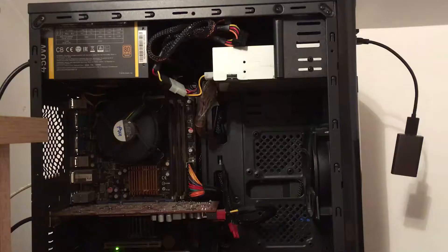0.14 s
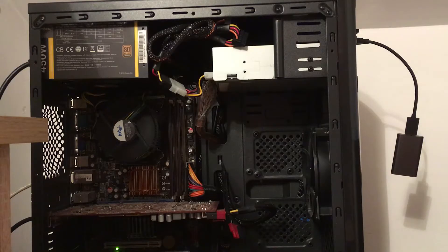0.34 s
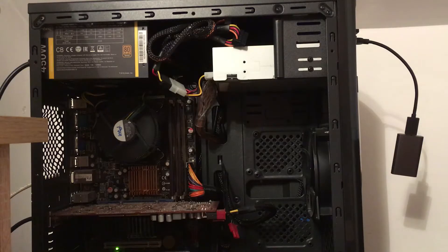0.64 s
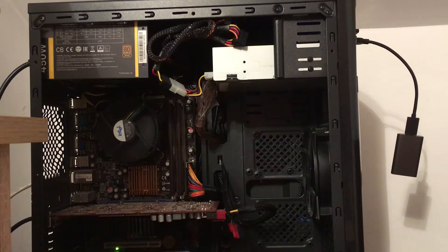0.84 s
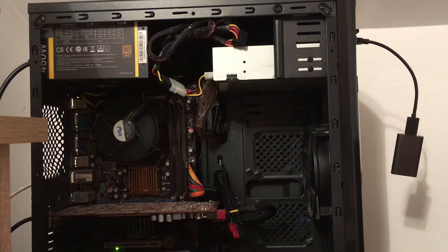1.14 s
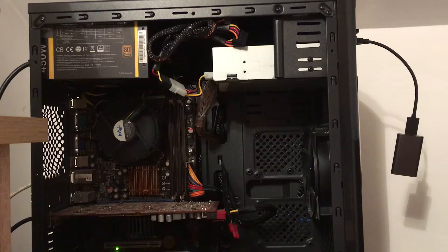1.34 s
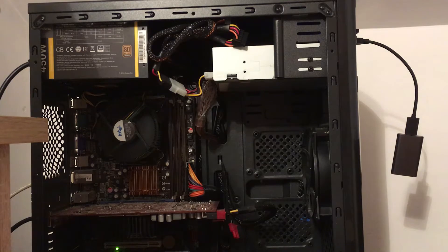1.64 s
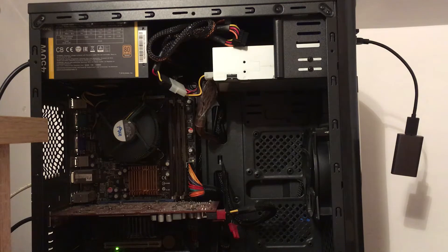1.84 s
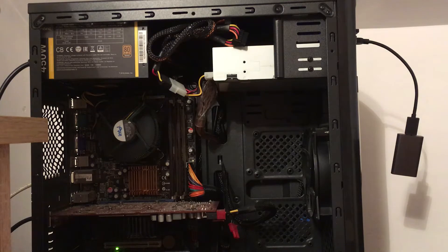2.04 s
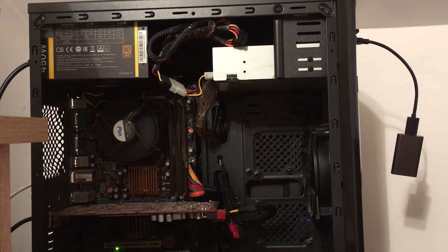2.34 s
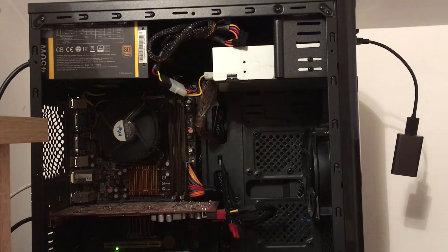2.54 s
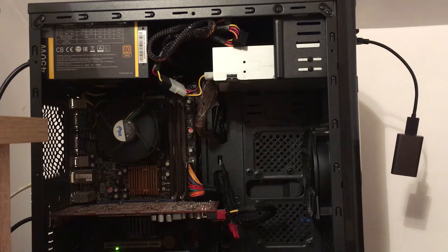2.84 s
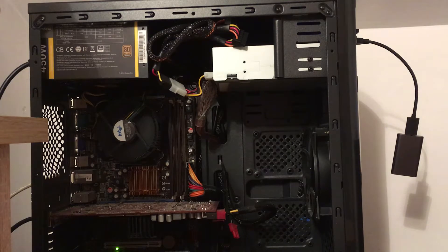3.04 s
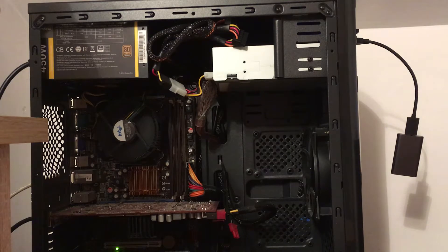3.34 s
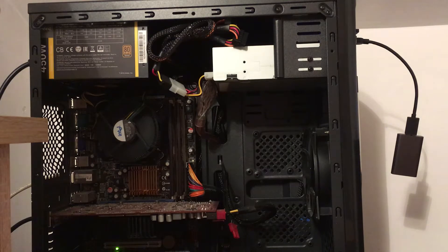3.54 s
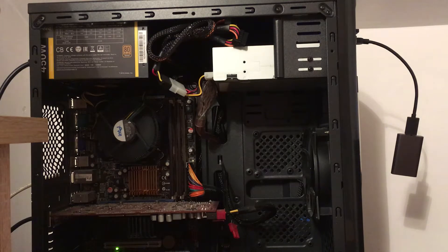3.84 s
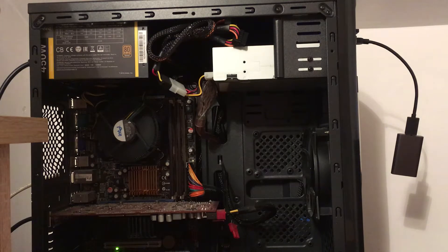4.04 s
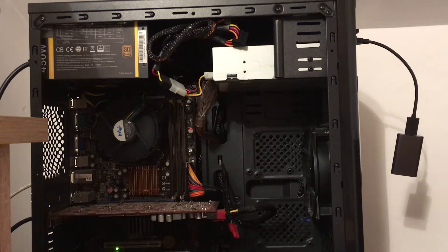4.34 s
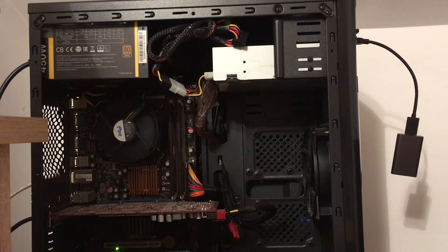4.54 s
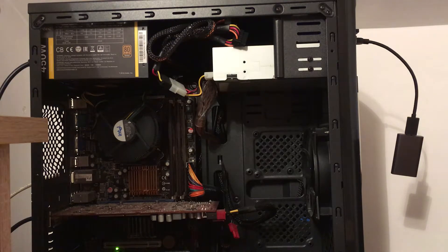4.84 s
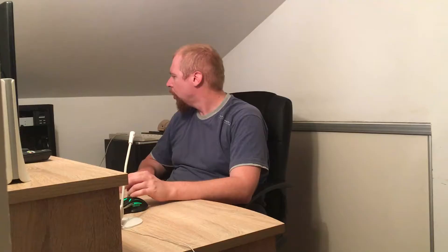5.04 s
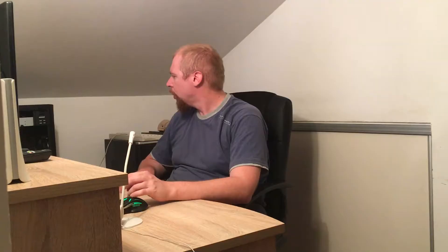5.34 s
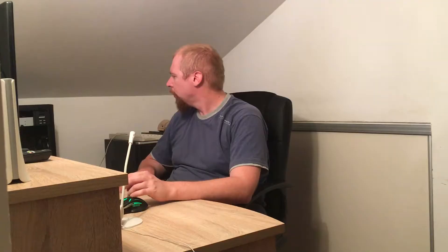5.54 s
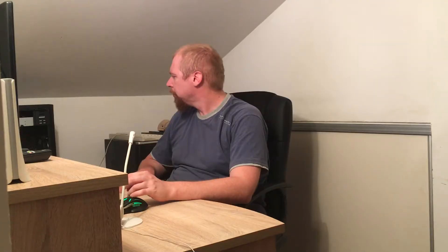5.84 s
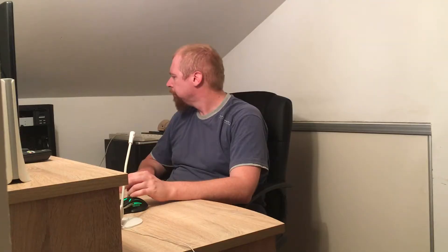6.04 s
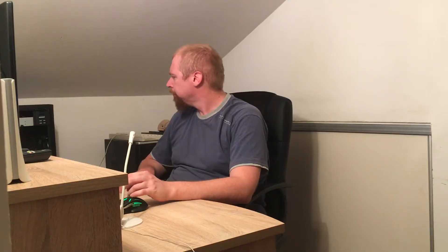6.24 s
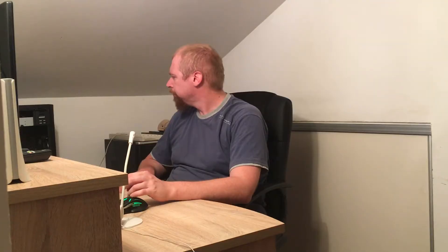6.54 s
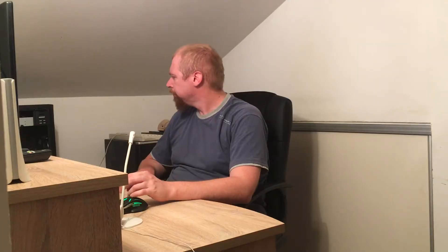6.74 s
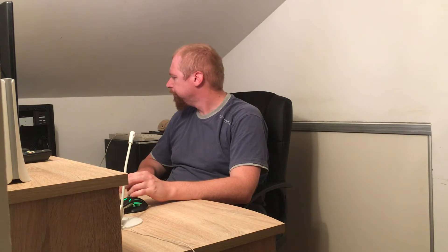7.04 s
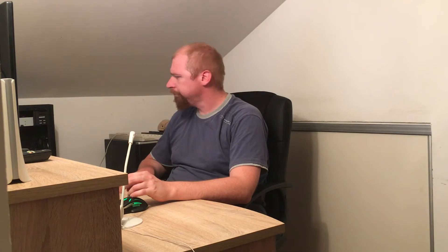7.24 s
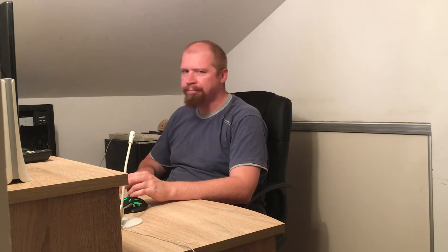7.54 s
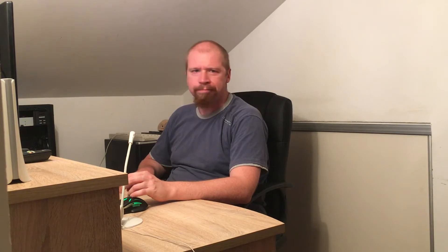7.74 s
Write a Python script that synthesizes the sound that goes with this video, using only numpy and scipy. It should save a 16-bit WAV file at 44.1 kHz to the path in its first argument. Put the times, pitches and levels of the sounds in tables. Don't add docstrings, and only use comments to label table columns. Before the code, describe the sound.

Continuous close-up computer fan noise indoors: a clear steady tone, smooth airy rush, deep hum and a thin electrical whine and buzz. Low draughts flutter on the microphone. A far engine climbs slowly in pitch early, drops out, returns fainter and disappears, with a barely audible glimpse near the end. The main fan tone rises louder around five seconds, then settles.

```python
import sys
import numpy as np
from scipy import signal
from scipy.fft import rfft, irfft, next_fast_len
from scipy.io import wavfile
from scipy.ndimage import uniform_filter1d

SR = 44100
rng = np.random.default_rng(int(sys.argv[2]) if len(sys.argv) > 2 else 0)


def volts(x):
    e = np.asarray(x, float) / 20
    return 10 ** e


def digitize_waveform(pressure):
    field = np.atleast_2d(pressure).T
    bounded = np.clip(field, -1, 1)
    quanta = np.round(bounded * 32767).astype(np.int16)
    wavfile.write(sys.argv[1], SR, quanta)


N = 348557
TIME = np.arange(N) / SR

# time_s, pitch_hz of its 32nd shaft order
REAR_SPEED = [
    (0, 686.5),
    (.75, 686.5),
    (1.8, 684.6),
    (2.9, 686.3),
    (4.2, 687.2),
    (4.85, 690.9),
    (5.8, 686.7),
    (7.1, 687.8),
    (7.9, 686.8),
]
REAR_ORDERS = [8, 9, 12, 17, 20, 28, 29, 33, 34]
REAR_DB = [-70, -71.5, -75.5, -70.5, -74, -73.5, -80, -68.5, -74.5]
PANEL_HZ, PANEL_DB = 694.7, -42.7
COOLER_HZ = 35.665
COOLER_ORDERS = [7, 8, 13, 14, 15, 16, 18, 20, 21, 24, 28, 29, 32, 35, 47, 56, 63]
COOLER_DB = [-69.5, -75, -77, -76, -76, -66.5, -76, -64, -72.5, -79, -73, -78, -79, -79, -84, -78, -82]
FRONT_HZ, SURGE_S = 5015, .3
# time_s, shift_hz
SURGES = [
    (0, -1.7),
    (.75, 4.6),
    (4.85, 2.8),
    (6.35, -2.3),
    (7.05, 2.6),
]
FRONT_ORDERS = [177, 193, 195, 196, 197, 207, 208, 210, 213, 220, 231, 238, 249, 251, 255, 257, 261, 262,
                263, 268, 269, 270, 272, 273, 282, 284]
FRONT_DB = [-85, -87, -85, -82.5, -84, -86, -83, -87, -87, -87, -81, -87, -83, -85, -82, -86, -82, -82, -81,
            -86, -82, -85, -85, -85, -82, -84]
# order, level_db (typical rms)
FRONT_REST = [(150, -97), (190, -93), (250, -91), (275, -94), (310, -101)]
HUM_HZ = [23.5, 43.7, 87.4, 111.5, 156.1, 4429.1, 4457.4]
HUM_DB = [-62, -67.5, -74, -67.5, -53.5, -81, -83]
HUM_WAVER_DB = [3, 3, 2.5, 3, .25, 1.5, 1.5]
MAINS_DB, SPINDLE_DB, SWELL_S = -59.5, -63.5, 0.17
MAINS_SWELLS = [
    (.2, 3.5),
    (2.25, 3),
    (3.8, 2.5),
    (4.85, 6),
    (6.3, 6.1),
    (7, 2.5),
]
SPINDLE_SWELLS = [
    (.1, 6.5),
    (1.6, 5.5),
    (2.5, 4.2),
    (3.4, 7),
    (4.6, 8.4),
    (5.7, 7.8),
    (6.7, 5.8),
    (7.4, 4.8),
]
COIL_HZ = 1441.38
COIL_ORDERS = [2, 2.5, 4, 6, 7, 8]
COIL_DB = [-84, -88, -75.5, -85.5, -99, -88.5]
ENGINE_HZ, CLIMB_HZ, CLIMB_S = 67.7, 6.4, 1.7
LIFT_AT_S, LIFT_S, LIFT_HZ = 6.7, .25, 4
LABOUR_S, LABOUR_AT_S, LABOUR_DB = 0.79, 0.35, 1.6
# start_s, end_s, level_db
HEARD = [
    (-.2, 2.15, -50.5),
    (2.6, 3.46, -55.5),
    (6.4, 7.1, -67),
]
HIDDEN_DB, EMERGE_S = -70, 0.057
# frequency_hz, level_db
THROB = [(.6, -20), (1.5, -3), (3.5, 0), (9, -8), (17, -10), (21, -13), (30, -17), (35, -22), (45, -30)]
BODY = [(30, -42), (36, -1), (100, -1), (140, -0.5), (195, -3), (225, -7.5), (265, -7.5), (320, -6),
        (420, -12.5), (480, -4), (570, -8.5), (660, -7.5), (800, -10), (900, -34)]
RUSH = [(470, -48), (800, -6.5), (989, -0.5), (1100, -3.5), (1280, -2.5), (1850, -5.5), (2060, -2.5),
        (2520, -6.5), (3330, -9.5), (4360, -10), (5490, -9), (5930, -8), (8000, -20), (10400, -31.5),
        (17600, -120)]
THROB_DB, BODY_DB, RUSH_DB = -60, -58, -58
# time_s, rise_db
DRAUGHTS = [(.45, 5), (1.2, 13.6), (1.85, 5.1), (2.6, 4), (3.2, 8), (4, 4), (4.5, 6), (5, 4), (5.6, 13.4),
            (6.1, 8.1), (6.45, 8.9), (7.25, 4)]
DRAUGHT_S = 0.21
# frequency_hz, width_hz, level_db (rms)
CAVITIES = [(257, 25, -71), (575, 40, -70), (930, 60, -72), (1320, 80, -74), (1435, 8, -79),
            (3520, 80, -78), (4450, 80, -77.5), (2100, 250, -73), (6150, 90, -75), (7420, 150, -83)]
# frequency_hz, level_db
HISS = [(5000, -20), (7000, -8.5), (9000, -3.5), (11000, -4), (15000, -5), (17000, -3)]
HISS_DB = -73
REFRESH_HZ = 59.9926
EDGES_S = [.001775, .005647]
EDGE_DB = [-49.8, -48.8]
CRACKLES_PER_S, CRACKLE_DB, CRACKLE_SPREAD_DB, CRACKLE_HZ = 25, -58, 3, 8300
# time_s, level_db (rms), length_s
RATTLES = [
    (.43, -68, .07),
    (.88, -65, .12),
    (1.41, -64, .07),
    (2.42, -68, .07),
    (3.33, -66, .09),
    (5.68, -65, .08),
    (6.49, -64, .11),
]


def evened(x):
    return x / np.sqrt(np.mean(x ** 2) + 1e-20)


def curve(rows, axis=1):
    rows = np.asarray(rows)
    return np.interp(TIME, rows[:, 0], rows[:, axis])


def drift(rate_hz):
    t = TIME[::256]
    rates = np.geomspace(rate_hz / 10, rate_hz, 16)
    slow = sum(np.sin(2 * np.pi * (f * t + rng.random())) / np.sqrt(f) for f in rates)
    return np.interp(TIME, t, evened(slow))


def swells(rows, length_s):
    t = TIME[::256]
    bells = sum(rise * np.exp(-.5 * ((t - s) / length_s) ** 2) for s, rise in rows)
    return np.interp(TIME, t, bells)


def sine(hz, level_db):
    turns = np.cumsum(hz * np.ones(N)) / SR
    return np.sqrt(2) * volts(level_db) * np.sin(2 * np.pi * (turns + rng.random()))


def tones(turns, orders, levels_db, waver_db, rate_hz):
    waver_db = waver_db * np.ones(len(orders))
    total = np.zeros(N)
    for order, db, waver in zip(orders, levels_db, waver_db):
        strength = np.sqrt(2) * volts(db) * np.exp(waver / 8.686 * drift(rate_hz))
        total += strength * np.sin(2 * np.pi * (order * turns + rng.random()))
    return total


def filtered_noise(gain_at):
    size = next_fast_len(N, True)
    gain = gain_at(np.fft.rfftfreq(size, 1 / SR))
    return irfft(rfft(rng.standard_normal(size)) * gain, size)[:N]


def coloured(spectrum):
    f, db = np.transpose(spectrum)
    return evened(filtered_noise(lambda hz: volts(np.interp(np.log(hz + .01), np.log(f), db, -120, -120))))


def rear_fan():
    hz = curve(REAR_SPEED)
    turns = np.cumsum(hz) / SR / 32
    panel = sine(hz, PANEL_DB - 20 * np.log10(PANEL_HZ - hz))
    return panel + tones(turns, REAR_ORDERS, REAR_DB, 1.5, 4)


def cooler_fan():
    return tones(COOLER_HZ * TIME, COOLER_ORDERS, COOLER_DB, .6, 3)


def front_fan():
    hz = FRONT_HZ + swells(SURGES, SURGE_S)
    turns = np.cumsum(hz) / SR / 219
    beat = 1 + .75 * np.cos(2 * np.pi * (TIME - 1.0) / 1.32)
    whistle = beat * sine(hz, -78 + 1.5 * drift(9))
    orders = np.arange(4097)
    rest_db = np.interp(orders, *np.transpose(FRONT_REST), -200, -200)
    rest = volts(rest_db + 3 * rng.standard_normal(len(orders)))
    phases = np.exp(2j * np.pi * rng.random(len(orders)))
    one_turn = irfft(rest * phases) * len(orders) * np.sqrt(2)
    ticks = np.interp(turns % 1, np.linspace(0, 1, len(one_turn)), one_turn)
    return whistle + ticks + tones(turns, FRONT_ORDERS, FRONT_DB, 3.5, 12)


def hums():
    mains = sine(49.45, MAINS_DB + swells(MAINS_SWELLS, SWELL_S))
    spindle = sine(120.1, SPINDLE_DB + swells(SPINDLE_SWELLS, SWELL_S))
    return mains + spindle + tones(TIME, HUM_HZ, HUM_DB, np.array(HUM_WAVER_DB), 3.3)


def coil_whine():
    return tones(COIL_HZ * TIME, COIL_ORDERS, COIL_DB, 0.54, 3)


def engine():
    climb = CLIMB_HZ * np.exp(-TIME / CLIMB_S)
    lift = LIFT_HZ / 2 * (1 + np.tanh((TIME - LIFT_AT_S) / LIFT_S))
    level_db = HIDDEN_DB + LABOUR_DB * np.cos(2 * np.pi * (TIME - LABOUR_AT_S) / LABOUR_S)
    for start, end, db in HEARD:
        emerged = np.tanh((TIME - start) / EMERGE_S / 2)
        gone = np.tanh((TIME - end) / EMERGE_S / 2)
        level_db = level_db + (db - HIDDEN_DB) / 2 * (emerged - gone)
    return sine(ENGINE_HZ - climb - lift, level_db)


def air():
    throb = coloured(THROB) * volts(THROB_DB + swells(DRAUGHTS, DRAUGHT_S))
    body = coloured(BODY) * volts(BODY_DB + 0.53 * drift(1.94))
    flicker = evened(uniform_filter1d(rng.standard_normal(N), size=500))
    rush = coloured(RUSH) * volts(RUSH_DB + .5 * flicker + .15 * drift(4))
    return throb + body + rush


def cavities():
    def resonances(hz):
        return sum(volts(db) * np.sqrt(2 * SR / (np.pi * width)) / (1 + (2 * (hz - f) / width) ** 2)
                   for f, width, db in CAVITIES)
    return filtered_noise(resonances)


def preamp_hiss():
    return volts(HISS_DB) * coloured(HISS)


def refresh_buzz():
    out, near = np.zeros(N + 800), np.arange(-24, 25)
    cycles_s = np.arange(int(N / SR * REFRESH_HZ)) / REFRESH_HZ
    for sign, edge_s, db in zip((-1, 1), EDGES_S, EDGE_DB):
        at = (edge_s + cycles_s) * SR
        index = at.astype(int)[:, None] + near
        spikes = np.sinc(index - at[:, None]) * np.hanning(len(near))
        np.add.at(out, index, sign * volts(db) * spikes)
    return signal.filtfilt(*signal.butter(2, 4000, "high", fs=SR), out)[:N]


def treble_ticks():
    happens = rng.random(N) < CRACKLES_PER_S / SR
    ticks = happens * volts(CRACKLE_DB + CRACKLE_SPREAD_DB * np.minimum(rng.exponential(1, N), 3))
    t = np.arange(60) / SR
    ring = np.sin(2 * np.pi * CRACKLE_HZ * t) * np.exp(-t / .0002)
    return signal.oaconvolve(ticks, ring)[:N]


def bearing_rattles():
    shake = sum(volts(db) * np.clip(1 - (2 * (TIME - s) / length) ** 2, 0, 1) for s, db, length in RATTLES)
    return shake * coloured([(3000, -20), (4000, -8), (5000, 1.5), (6300, -1), (7500, -6)])


def scene():
    fans = rear_fan() + cooler_fan() + front_fan()
    electrics = hums() + coil_whine()
    clicks = treble_ticks() + bearing_rattles()
    return (fans + electrics + engine() + air() + cavities() + clicks)[None]


def low_pass(x):
    return signal.sosfilt(signal.butter(12, 15820, fs=SR, output="sos"), x)


def record(dry):
    wired = dry + preamp_hiss() + refresh_buzz()
    lowpass = signal.firwin(1501, 15740, window=("kaiser", 8), fs=SR)
    mix = signal.oaconvolve(wired, lowpass[None], "same")
    return low_pass(mix)


dry = scene()
out = record(dry)
digitize_waveform(out)
```